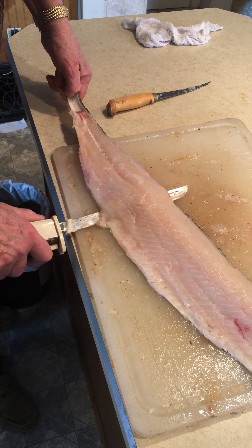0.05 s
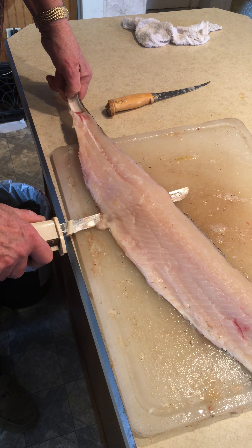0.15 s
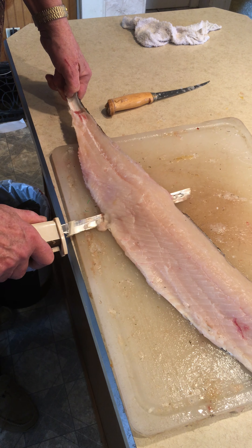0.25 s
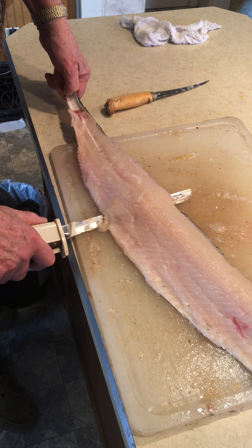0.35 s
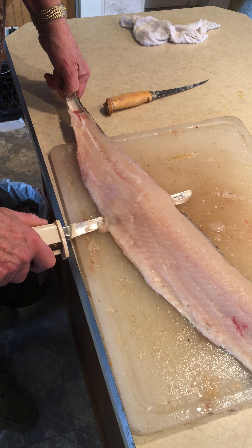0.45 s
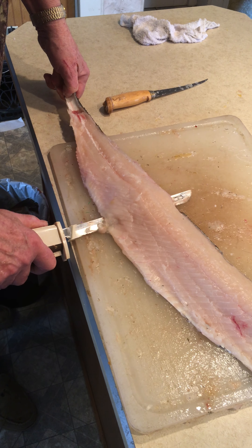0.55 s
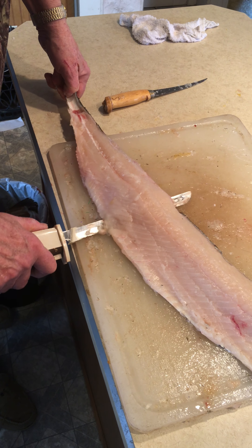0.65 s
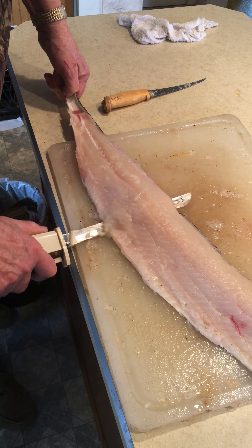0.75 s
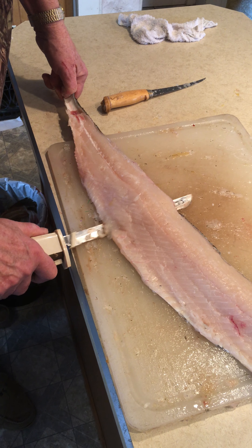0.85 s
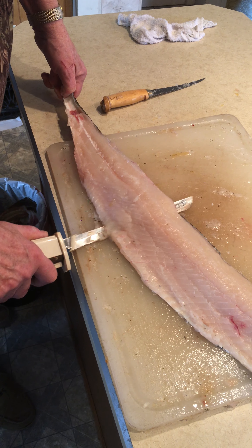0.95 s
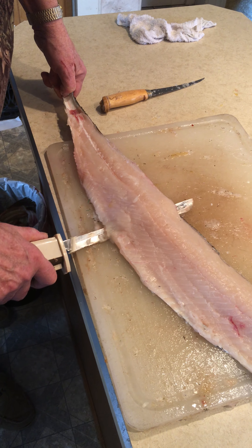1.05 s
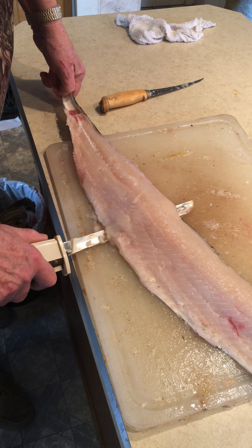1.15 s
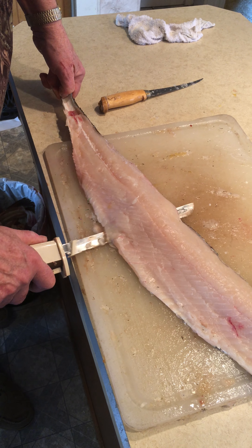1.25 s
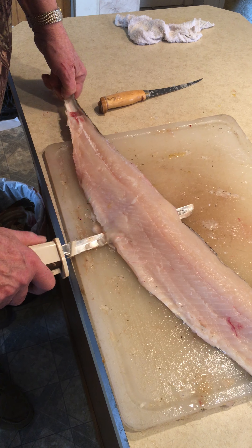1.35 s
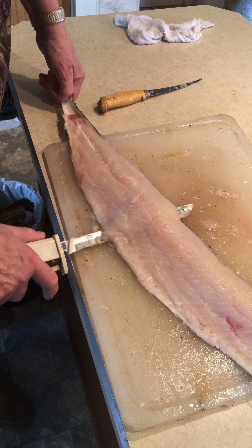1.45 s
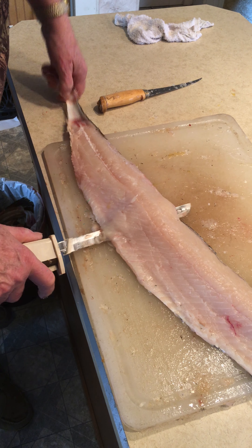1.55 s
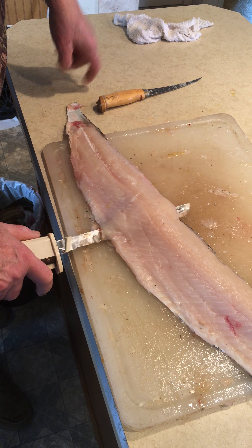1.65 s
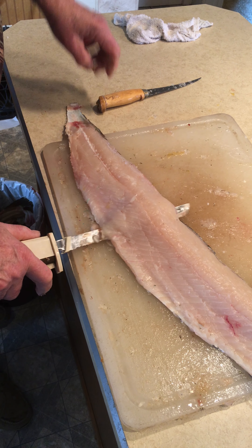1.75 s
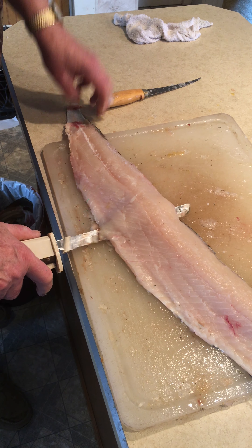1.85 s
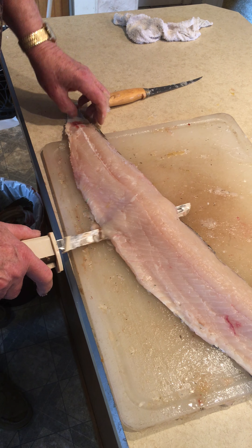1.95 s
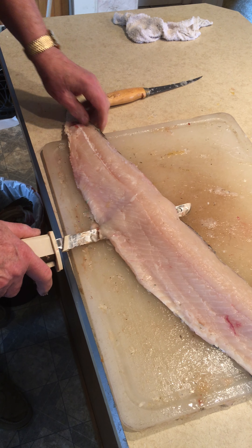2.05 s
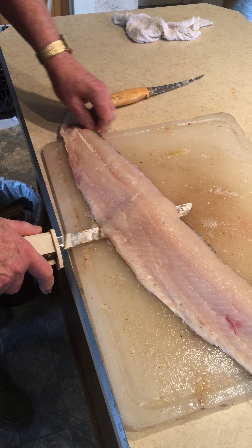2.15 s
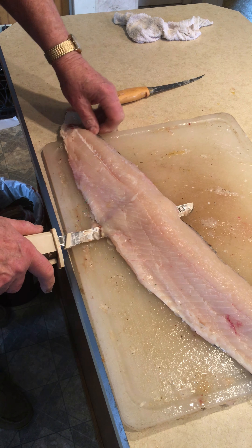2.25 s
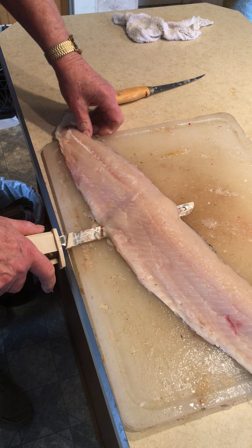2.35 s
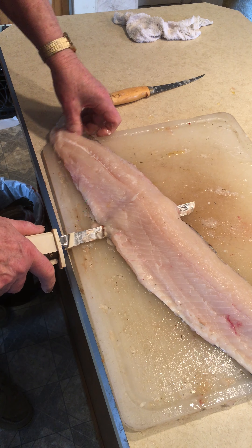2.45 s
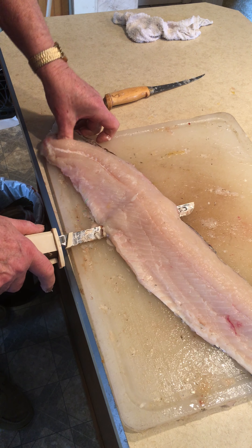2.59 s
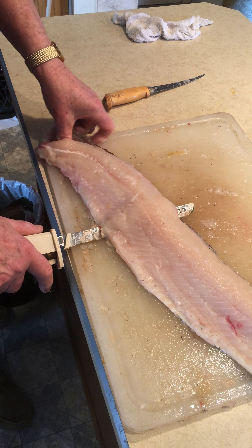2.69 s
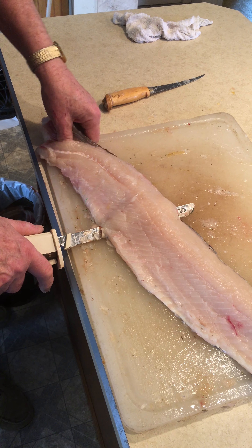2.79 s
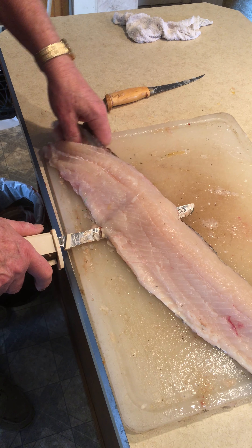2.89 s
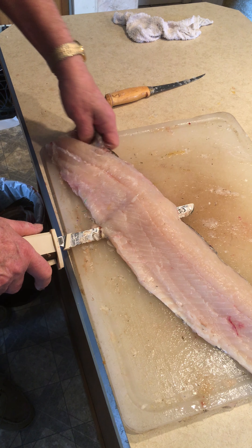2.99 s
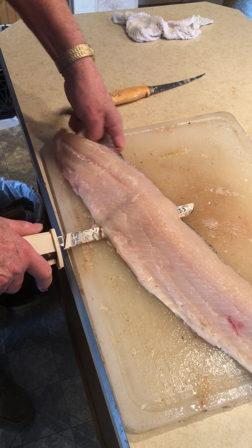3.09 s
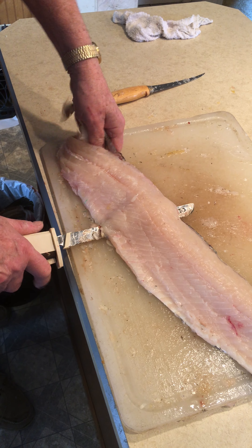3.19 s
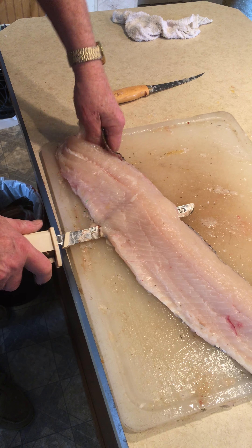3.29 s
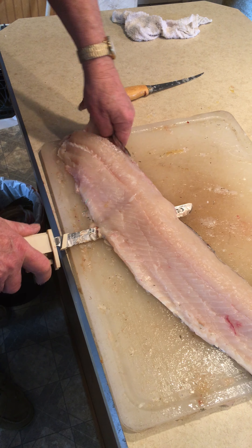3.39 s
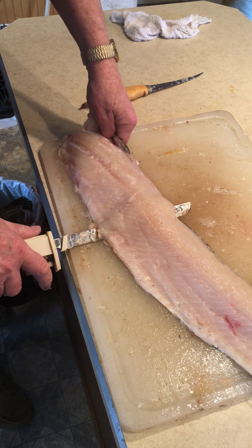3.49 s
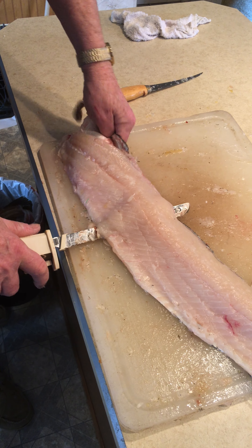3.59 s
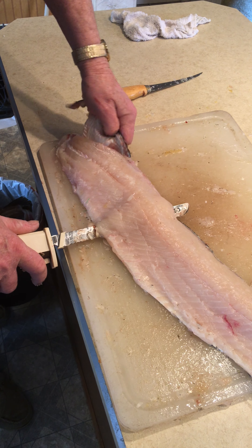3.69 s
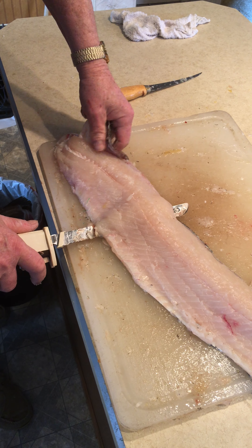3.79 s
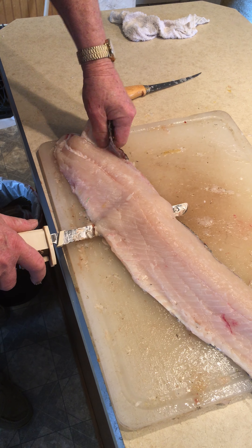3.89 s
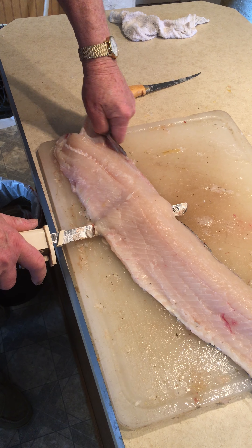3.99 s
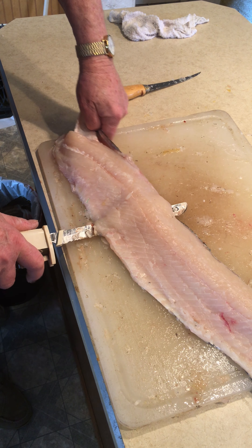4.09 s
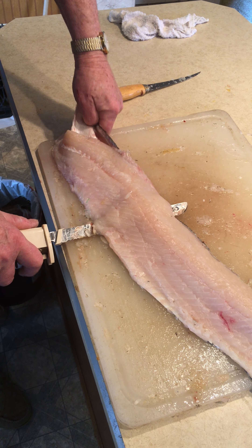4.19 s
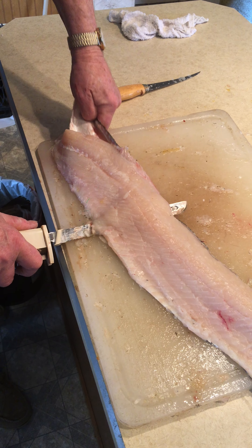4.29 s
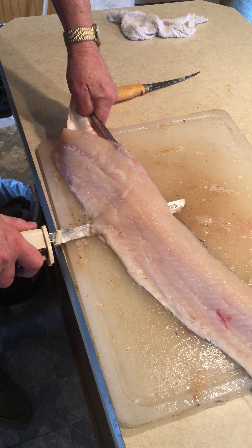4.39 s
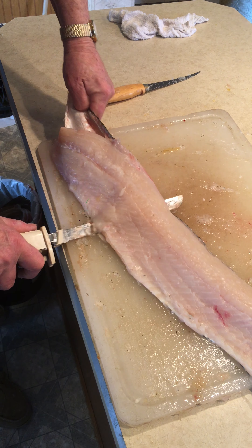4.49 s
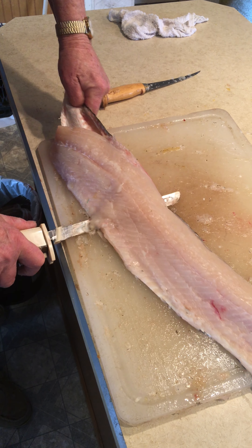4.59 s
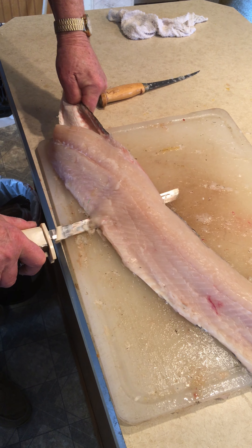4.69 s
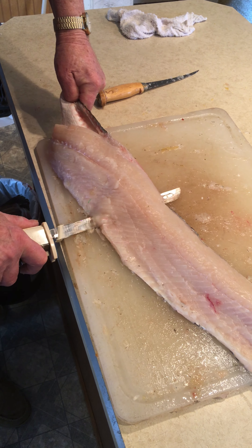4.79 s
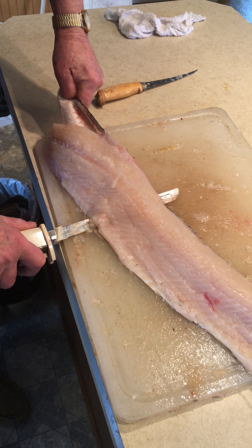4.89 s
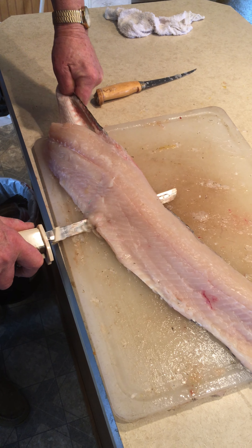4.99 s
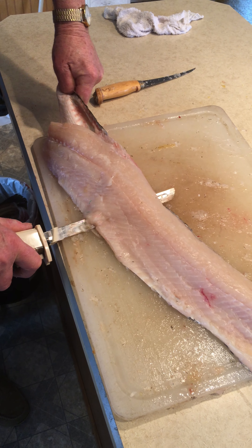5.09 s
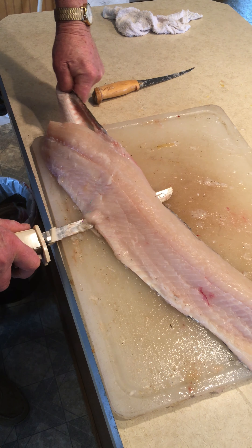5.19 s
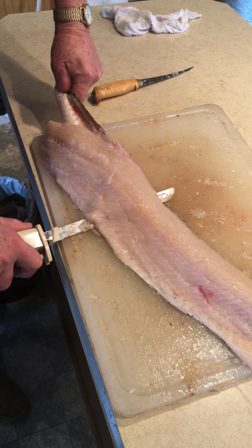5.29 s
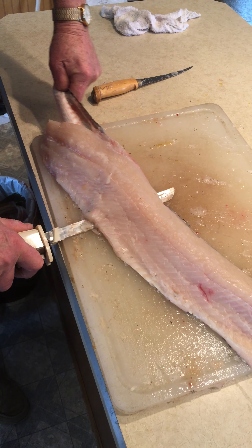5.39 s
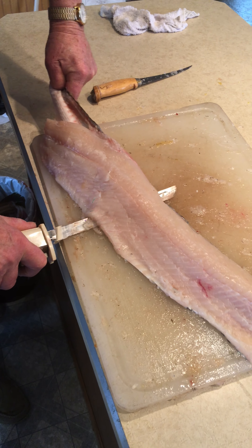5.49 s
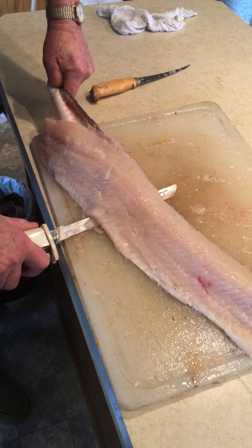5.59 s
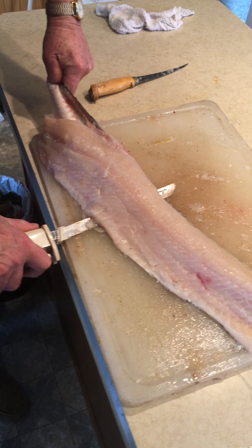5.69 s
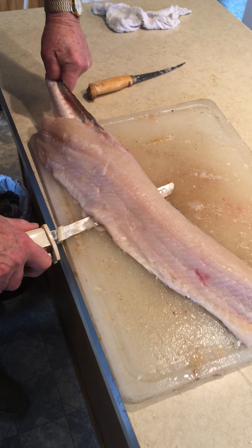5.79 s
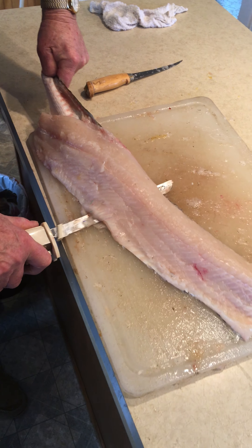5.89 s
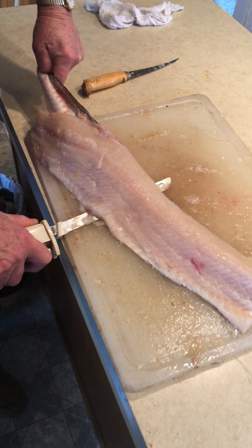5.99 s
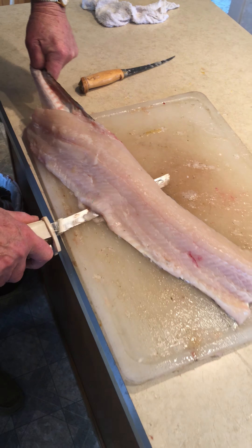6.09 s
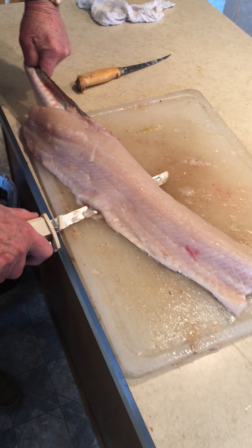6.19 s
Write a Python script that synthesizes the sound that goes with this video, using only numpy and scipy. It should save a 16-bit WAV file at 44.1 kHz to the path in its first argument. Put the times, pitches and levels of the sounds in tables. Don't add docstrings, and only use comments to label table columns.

```python
import sys
import numpy as np
from scipy import signal
from scipy.fft import rfft, irfft, next_fast_len
from scipy.io import wavfile
from scipy.ndimage import uniform_filter1d, map_coordinates

SR = 44100
rng = np.random.default_rng(int(sys.argv[2]) if len(sys.argv) > 2 else 0)


def file_out(sig):
    cols = np.atleast_2d(sig).T
    lim = np.clip(cols, -1, 1)
    pcm = np.round(lim * 32767).astype(np.int16)
    wavfile.write(sys.argv[1], SR, pcm)


def attenuation_scalar(level_db):
    decades = np.asarray(level_db, float) / 20
    return 10 ** decades


N = 275625
T = np.arange(N) / SR

# time_s, turns_per_second_hz
SETTLED_SPEED = [(0, 287), (.4, 286.8), (.72, 290.3), (1.2, 285.9), (1.43, 291.9), (4.29, 325.1),
                 (5.1, 299), (5.3, 302.7), (5.52, 300.8), (5.72, 293.05), (6.25, 281.45)]
# time_s, level_db
FIELD_PULL = [(0, 1.5), (.3, 2.5), (.8, 0), (1, 5.5), (1.43, 2.5), (4.3, -9.5), (4.7, 1), (5.05, 1),
              (5.3, 1.5), (5.7, 1.5), (6, 3), (6.25, 1.5)]
# pitch_hz, level_db
CASING = [(1500, -79), (1850, -50), (2000, -51), (2150, -45.5), (2195, -42), (2270, -40), (2390, -29),
          (2437, -44.5), (2510, -37)]
# pitch_hz, level_db
START_TONES = [(2000, -80), (2300, -39), (3150, -33), (3700, -36.5), (4200, -40.5), (6000, -39),
               (6800, -75)]
# shaft_multiple, level_db (against the knock)
SHAFT_HUM = [(1, -12.5), (2, -30), (24, -22), (32, -24), (40, -20), (48, -20), (4, -26.5), (5, -14.5),
             (6, -18.5), (7, -9), (9, -6), (12, -24), (13, -17.5), (14, -13.5), (15, -14.5)]
# stroke_multiple, level_db
BOARD_SHAKE = [(2, -11), (3, -5), (4, -4), (5, 0), (6, 3), (7, -4), (8, -8), (9, -12)]
# stroke_angle_turns, level_db
CAM_BLOWS = [(0.329, 3.5), (0.391, -30), (0.55, -7), (0.829, -0.5), (0.151, -3.5), (0.675, -5)]
# stroke_angle_turns, level_db
HANDLE_THUMPS = [(.355, 0), (.872, -11), (.115, -14), (.565, -10)]
# time_s, thump_db, knock_db, grip_0_to_1
HAND = [(0, -0.5, -1.5, 0.1), (.3, -1.5, -1, 0.1), (.55, -0.5, -2, 0), (.85, 0, -2.5, 0.2),
        (1.15, -3, -2.5, 0.5), (1.35, -0.5, -0.5, 0.04), (1.5, 2, -4, 0), (4.3, -6.5, -5.5, 0.5),
        (4.7, -4, -1.5, 0.23), (5.2, -4, -5, .6), (5.5, -1, -3, 0.83), (5.85, -1, -3.5, .9),
        (6.25, -0.5, -1, 0.76)]
# time_s, lag_turns
TICK_LAG = [(0, .025), (1.1, .027), (1.43, .062), (1.52, .045), (1.62, 0), (4.2, 0), (4.3, .065),
            (4.75, .04), (6.25, .025)]
# pitch_hz, width_hz, level_db
HOUSING = [(447, 146, -6.5), (1220, 340, -2), (1915, 69, -2), (4054, 500, -5)]
# pitch_hz, width_hz, level_db
LOOSE_SHELL = [(847, 70, 0.5), (936, 60, -2.5), (1025, 26, -6)]
# pitch_hz, width_hz, level_db
GRIPPED_SHELL = [(778, 70, 0), (908, 56, -8), (980, 67, 0.5)]
# pitch_hz, width_hz, level_db
BLADE = [(6260, 1400, -15), (9300, 490, 3.5), (11100, 350, -3.5), (13000, 380, -6), (15600, 430, -24)]
# time_s, pitch_hz
BLADE_BEND = [(0, 9200), (4.3, 9200), (4.5, 8600), (5.45, 8500), (5.8, 9300), (6.25, 10000)]
# pitch_hz, level_db (per Hz)
RATTLE_COLOUR = [(150, -68), (250, -20.5), (294, -2), (345, -2), (648, -10), (748, -4), (944, -8),
                 (1650, -5.5), (2360, -4.5), (2980, -9), (4420, -8), (5010, -13.5), (16400, -25),
                 (17200, -28), (18300, -40)]
# centre_s, half_width_s, level_db
BOARD_PRESSES = [
    (1.0, 0.12, 24),
    (4.93, 0.032, -17),
]
# pitch_hz, level_db (per Hz)
AIR_COLOUR = [(15, -29), (25, 29), (64, 10.5), (550, -9.5), (1100, -5.5), (3900, -18), (5000, -43.5),
              (6580, -37), (14700, -45), (16800, -90), (18300, -51)]
# centre_s, half_width_s, level_db
AIR_SWELLS = [
    (4.07, 0.18, -8),
    (2.74, 0.17, 5),
    (3.6, 0.067, 4),
]
# pitch_hz, time_to_fall_60_db_s
ECHO = [(150, 0.52), (1000, 1), (4000, 0.065), (12000, 0.025)]
# start_s, peak_db, pitch_hz, knock_db
THUDS = [(0.918, -23.5, 151, 11.5), (0.959, -24.5, 99, 11), (0.999, -20, 102.8, 8), (1.052, -27, 145, 8),
         (1.973, -31.5, 99, -11), (2.167, -40, 78, 10), (2.483, -32, 109.5, 7), (2.97, -33.5, 119.5, -4.5),
         (3.129, -28, 124.3, -11), (3.165, -30, 91, -22), (3.2, -41, 84.4, -22), (4.12, -44.5, 69, -24),
         (5.07, -34, 79.6, -20), (1.701, -41, 80, -20), (3.265, -36, 56, -12), (3.399, -35, 62, -10),
         (3.518, -41, 120, -16), (3.877, -48, 80.5, 17.5), (4.907, -28, 141, 19.5), (4.939, -20.5, 154, 12)]
# start_s, peak_db, ring_hz, crack_db
SLAP = [
    (1.927, -19.5, 970, -21),
    (1.926, -17.5, 1520, -21),
]
# start_s, peak_db, ring_hz, crack_db
SKIN_SNAPS = [(2.713, -33.5, 2750, -4), (3.9015, -39, 7050, -7), (2.9874, -41, 1820, -11),
              (3.035, -43, 1700, -21), (3.138, -31, 2300, 1), (3.157, -35.5, 2420, 7),
              (3.241, -35, 2150, -1), (3.2672, -22.5, 2030, -19), (3.304, -19, 8000, -19),
              (3.399, -22, 3340, -6), (3.4445, -28.5, 2500, 3), (3.4714, -14.5, 2290, -31),
              (3.6583, -23, 3900, -26), (3.6625, -27.5, 2280, -21), (3.693, -14, 6060, -32),
              (3.713, -20, 6490, -15), (3.7326, -27, 2050, 4), (3.763, -22, 3120, -18),
              (3.822, -29, 4030, -19), (3.847, -29, 5900, -4), (3.865, -25, 7060, -9),
              (3.883, -15.5, 7050, -3), (3.883, -28, 3040, -20), (3.881, -34.5, 820, -25),
              (3.918, -34, 3320, -9), (4.004, -38.5, 3840, 4), (4.039, -35, 6490, -5),
              (4.1, -26.5, 7900, -3), (4.215, -38.5, 1600, 10), (4.291, -22.5, 3370, -2)]
# start_s, peak_db, ring_hz, crack_db
SMALL_SNAPS = [(3.1208, -47, 12000, -10), (3.141, -38, 2400, -4), (3.198, -40, 9100, 3),
               (3.2953, -33, 2050, -15), (3.283, -38, 4000, -5), (3.288, -36, 10500, -5),
               (3.347, -41, 9000, 2), (3.3817, -44, 2680, -5.5), (3.402, -32, 12100, 4),
               (3.407, -36, 13500, -4), (3.42, -39, 8000, -5), (3.426, -40, 3100, -15),
               (3.456, -40, 13000, -5), (3.463, -35, 11500, -5), (3.467, -32, 8200, -3),
               (3.48, -30, 2300, -15), (3.491, -38, 2300, -15), (3.51, -43, 12000, -3),
               (3.517, -45, 12000, -3), (3.667, -25, 3950, -16), (3.678, -47, 7000, -3),
               (3.716, -24, 6300, -3), (3.719, -26, 9000, -7), (3.7304, -19, 6800, -10),
               (3.735, -28, 2600, -10), (3.7383, -26, 2700, -12), (3.742, -26, 2820, -13),
               (3.777, -39, 9500, -5), (3.952, -38, 6000, 3), (4.021, -46, 11000, -9),
               (4.0747, -42, 2420, 6), (4.084, -46, 9000, 0), (4.155, -40, 4000, -10),
               (4.174, -34, 8200, -6), (4.219, -36, 2110, 4), (4.2722, -39, 4070, 2),
               (4.281, -43, 8000, -3), (4.296, -27, 1060, -20)]
# start_s, peak_db
DRY_TICKS = [(2.6283, -45.5), (2.6462, -41), (2.9275, -46), (3.155, -42), (3.227, -36), (3.2662, -32.5),
             (3.286, -42), (3.338, -37), (3.396, -55), (3.4383, -36), (3.4614, -46), (3.5693, -40),
             (3.6769, -53), (3.735, -36), (3.7635, -21.5), (3.8066, -36), (3.8235, -40), (3.8475, -44),
             (3.8699, -35), (3.882, -21), (3.9014, -28), (3.9178, -31), (4.0586, -34), (4.1184, -56),
             (4.137, -34), (4.161, -36), (4.213, -36), (4.2351, -41), (4.2523, -38), (4.2887, -34)]
# centre_s, half_width_s, level_db
GRIPS = [
    (3.29, 0.04, 10),
    (3.44, 0.057, 8),
    (3.72, 0.081, 15.5),
    (3.86, 0.063, 9.5),
    (4.22, 0.097, 5.5),
    (2.83, 0.025, 6.5),
    (3.15, 0.02, 5),
]
# pitch_hz, width_hz, level_db
COUNTER = [(317, 81, -6), (1183, 120, -5)]
# centre_s, half_width_s, level_db
SLIDES = [
    (3.45, 0.067, 3.7),
    (3.65, 0.21, 11.6),
]

OFF_S, ON_S, FADE_S, FULL_HZ = 1.43, 4.29, .04, 290
BRAKE_HZ, SAG_HZ_PER_S, CREEP_HZ_PER_S, REST_S = 18.75, 204.6, 150.7, 2.9
SLOW_SHARE, SLOW_S, QUICK_S = .635, .266, .042
UPPER_DB, LOWER_DB, OCTAVE_DB, OCTAVE_GROWS = -2.5, -2.5, -52, 1.1
KNOCK_DB, KNOCK_GROWS, FREE_DB, FREE_GROWS = -38.5, .43, -20, 5.2
RATTLE_DB, RATTLE_GROWS, IDLE_DB = -33.5, 1.09, -.77
BOARD_DB, BOARD_GROWS = -51, 2
TICK_DB, TICK_GROWS, RESEATED_DB = -28.5, 1, -4
SLACK_DB, STALL_HZ = -33, 58
DULL_HZ, DULL_SHARE = 9000, .45
HUM, FREE_HUM = .25, .8
AIR_DB, DAMP_DB, SCRAPE_DB = -50, -64, -72
INRUSH_DB, INRUSH_S = 2, .07


def unit(x):
    return x / np.sqrt(np.mean(x ** 2) + 1e-20)


def along(points, hz):
    f, v = np.transpose(points)
    return np.interp(np.log(hz + 1), np.log(f + 1), v)


def curves(rows, outside=-120):
    s, *cols = np.transpose(rows)
    return np.array([np.interp(T, s, c, outside, outside) for c in cols])


def swells(rows):
    return sum(db * np.exp(-((T - s) / width) ** 2) for s, width, db in rows)


def wobble(rate):
    coarse = np.arange(0, N + 8, 8)
    knots = rng.standard_normal(int(N * rate / SR) + 4)
    return np.interp(np.arange(N), coarse, map_coordinates(knots, [coarse * rate / SR]))


def filtered(x, response):
    m = next_fast_len(N + SR // 2)
    return irfft(rfft(x, m) * response(np.fft.rfftfreq(m, 1 / SR)), m)[:N]


def body(modes):
    def response(f):
        return sum((-1) ** k * attenuation_scalar(db) * 1j * f * w / (c * c - f * f + 1j * f * w)
                   for k, (c, w, db) in enumerate(modes))
    return response


def steep(modes):
    return lambda f: sum(attenuation_scalar(db) * body([(c, w, 0)])(f) ** 2 for c, w, db in modes)


def thin_bass(corner_hz):
    return lambda hz: 1 - .7 / (1 + (hz / corner_hz) ** 4)


def hiss(spectrum):
    return unit(filtered(rng.standard_normal(N), lambda hz: attenuation_scalar(along(spectrum, hz))))


def turns():
    settle = curves(SETTLED_SPEED, None)[0]
    off, on = T - OFF_S, np.maximum(T - ON_S, 0)
    released_hz = np.interp(OFF_S, *np.transpose(SETTLED_SPEED))
    sag = released_hz - BRAKE_HZ * np.clip(off / FADE_S, 0, 1) - SAG_HZ_PER_S * off
    coast = np.maximum(np.maximum(sag, CREEP_HZ_PER_S * (REST_S - T)), 0)
    missing = SLOW_SHARE * np.exp(-on / SLOW_S) + (1 - SLOW_SHARE) * np.exp(-on / QUICK_S)
    start = settle * (1 - missing)
    shaft = np.cumsum(np.where(off < 0, settle, coast + start)) / SR
    return shaft, shaft / 10 + .62 * (T > 3.5)


def switch():
    return np.clip(1 - (T - OFF_S) / FADE_S, 0, 1) + np.clip(100 * (T - ON_S), 0, 1)


def singing(speed, power):
    pull_db = curves(FIELD_PULL, None)[0]
    off_db = 60 * (power - 1)
    slot, upper, lower = (along(CASING, np.abs(8 * speed + side)) + pull_db + off_db
                          for side in (0, 120, -120))
    return slot, upper + UPPER_DB, lower + LOWER_DB, OCTAVE_DB + OCTAVE_GROWS * pull_db + off_db


def brushes(spin, speed, stroke, power):
    def skip(k):
        return wobble(550) * attenuation_scalar(2 * wobble(60)) * np.sin(k * spin)

    drag = np.abs(np.sin(np.pi * (stroke - .97)))
    free = attenuation_scalar(np.clip(16 - speed / 12, 2, 10.5)) * (speed > STALL_HZ) * (1 - power)
    free = free * .8 * drag ** .9 * attenuation_scalar(1.6 * wobble(60)) * skip(34)
    return free + attenuation_scalar(-1) * power * skip(24)


def motor(shaft, stroke, knock_db, rattle_db, power):
    speed = np.gradient(shaft) * SR
    slot_db, upper_db, lower_db, octave_db = singing(speed, power)
    surge = power * np.clip((282 - speed) / 25, 0, 1) * np.clip((speed - 70) / 30, 0, 1)
    surge_db = 30 * (surge - 1)
    octave_db = np.maximum(octave_db, surge_db + along(START_TONES, 16 * speed))
    octave_db = octave_db + 2 - 2 * surge + 3 * wobble(150) + 2 * surge * np.sin(4 * np.pi * stroke)
    third_db = surge_db + along(START_TONES, 24 * speed) - np.clip(speed / 5 - 25, 6, 16) + 3 * wobble(90)
    fourth_db = surge_db + along(START_TONES, 32 * speed) - 14
    seventh_db = 30 * surge * np.clip((speed - 235) / 20, 0, 1) - 69
    linger = np.roll(uniform_filter1d(power, size=5000), 4500)
    spin, mains = 2 * np.pi * shaft, 2 * np.pi * 120 * T

    def tone(phase, db):
        unsteady = 2 * np.pi * rng.random() + .12 * wobble(70)
        return np.sqrt(2) * attenuation_scalar(db + wobble(30)) * np.sin(phase + unsteady)

    whine = tone(8 * spin, slot_db + 7 * surge)
    whine += tone(8 * spin + mains, upper_db + 9 * surge)
    whine += tone(8 * spin - mains, lower_db)
    whine += tone(8 * spin + 2 * mains, lower_db - 6)
    whine += tone(16 * spin + .85 * wobble(400), octave_db)
    whine += tone(24 * spin + .8 * wobble(250), third_db)
    whine += tone(32 * spin + wobble(250), fourth_db)
    whine += tone(7 * spin, seventh_db)
    whine += tone(mains, 30 * surge - 83)
    for k, db in SHAFT_HUM:
        loss_db = (14 + 12 / k * (1 - linger)) * (1 - power) + 10 * surge / k
        whine += tone(k * spin, knock_db + db - loss_db + .5 * wobble(3.1))

    def window(hz):
        return body([(3200, 3600, 0)])(hz) ** 2 / (1 + (hz / 4600) ** 12) / (1 + (2000 / (hz + 1)) ** 8)

    return whine + filtered(attenuation_scalar(rattle_db) * brushes(spin, speed, stroke, power), window)


def contacts(stroke, blows, scatter_db, slack):
    angle, db = np.transpose(blows)
    whole = np.arange(int(stroke[-1]) + 1)[:, None]
    uneven = slack * rng.standard_normal((len(whole), len(angle)))
    at = np.interp(whole + angle + uneven, stroke, np.arange(N))
    size = attenuation_scalar(db + scatter_db * rng.standard_normal(at.shape)) * (at < N - 1)
    return np.bincount(at.astype(int).ravel(), size.ravel(), N)


def knocks(stroke, power, middle, knock_db, tick_db):
    teeth = [(k / 10 + .02, db) for k, db in enumerate(rng.normal(-27, 4, 10))]
    loaded = contacts(stroke, CAM_BLOWS + teeth, scatter_db=1, slack=.0008)
    thump_db, cam_db, grip = curves(HAND, None)
    thump = attenuation_scalar(KNOCK_DB + 54.5 + thump_db) * np.roll(power, 1500)
    thump = thump * contacts(stroke, HANDLE_THUMPS, scatter_db=1.1, slack=.0008)
    knock = filtered(attenuation_scalar(knock_db + 47 + cam_db) * power * loaded, steep(HOUSING))
    for share, shell in ((1 - grip, LOOSE_SHELL), (grip, GRIPPED_SHELL)):
        knock += filtered(share * thump, lambda hz: sum(body([half])(hz) for half in shell)
                          * body([(880, 520, 0)])(hz))
    handle = body([(340, 240, 5), (820, 200, 2), (1250, 440, 0), (1900, 300, -1)])
    return knock + filtered(attenuation_scalar(tick_db + 29) * (1 - power) * np.roll(middle, 70), handle)


def ticks(stroke, power, middle, ends, rattle_db, tick_db):
    free = 1 - power
    tick = filtered(attenuation_scalar(tick_db + 30.5) * np.roll(power, 2500) * middle, body(BLADE[2:4]))
    tick += filtered(attenuation_scalar(tick_db + 26) * free * middle + attenuation_scalar(rattle_db + 21) * ends, body(BLADE))
    tick += filtered(attenuation_scalar(rattle_db + 19) * free * ends, steep([(10500, 9000, 0)]))
    tick += filtered(attenuation_scalar(rattle_db + 27) * power * ends, body([(4440, 650, 0)]))
    moving = np.gradient(stroke) * SR > STALL_HZ / 10
    closing = attenuation_scalar(SLACK_DB + 23) * moving * free * (middle + .5 * ends)
    return tick + filtered(closing, steep([(7200, 1800, 0)]))


def blade_rattle(power, middle, ends, rattle_db):
    free = 1 - power
    burst = signal.lfilter([1], [1, -np.exp(-1 / (.0013 * SR))], ends + .4 * middle)
    level = attenuation_scalar(rattle_db + 1 + 1.2 * wobble(120) + free * wobble(70))
    rattle = level * (1 + 1.1 * burst) * hiss(RATTLE_COLOUR)
    steel = body(BLADE[:1] + BLADE[2:])
    loose = filtered(rattle, lambda hz: thin_bass(1500)(hz) * (1 + .5 * np.abs(steel(hz))))
    loose += filtered((HUM * power + FREE_HUM * free) * rattle, body([(820, 360, 0)]))
    bend_hz = curves(BLADE_BEND, None)[0]
    for ring_hz in (8600, 9250, 9900):
        near = np.clip(1 - np.abs(bend_hz - ring_hz) / 650, 0, 1)
        loose += filtered(near * rattle, lambda hz: .8 * np.abs(body([(ring_hz, 500, 0)])(hz)) ** 2)
    treble = filtered(loose, lambda hz: 1 / (1 + (DULL_HZ / (hz + 1)) ** 4))
    return loose - DULL_SHARE * free * treble


def board(stroke, power, board_db):
    shake = sum(attenuation_scalar(db + wobble(17)) * np.sin(2 * np.pi * (k * stroke + rng.random()))
                for k, db in BOARD_SHAKE)
    rumble = (.9 + 3.3 * (1 - power)) * hiss([(40, -32), (70, -19), (200, -3), (400, -14)])
    return attenuation_scalar(board_db) * (power * shake + rumble)


def gears(stroke, power, knock_db, rattle_db, tick_db, board_db):
    lag = curves(TICK_LAG, None)[0]
    middle = contacts(stroke - lag, [(.535, 0)], scatter_db=1.5, slack=.002)
    ends = contacts(stroke - lag / 2, [(.29, -2), (.795, 1)], scatter_db=2, slack=.003)
    clatter = knocks(stroke, power, middle, knock_db, tick_db)
    clatter += ticks(stroke, power, middle, ends, rattle_db, tick_db)
    clatter += blade_rattle(power, middle, ends, rattle_db)
    return clatter + board(stroke, power, board_db)


def knife():
    shaft, stroke = turns()
    power, speed = switch(), np.gradient(shaft) * SR
    free = 1 - power
    speed_db = 20 * np.log10(np.abs(speed) / FULL_HZ + 1e-3)
    press_db = swells(BOARD_PRESSES)
    knock_db = power * (KNOCK_DB + KNOCK_GROWS * speed_db + .08 * press_db)
    knock_db += free * (FREE_DB + FREE_GROWS * speed_db)
    rattle_db = RATTLE_DB + RATTLE_GROWS * speed_db
    rattle_db += free * (IDLE_DB - .033 * np.clip(75 - speed, 0, 40))
    slack_db = SLACK_DB - np.clip((85 - speed) / 4, 0, 5) - np.clip((speed - 120) / 20, 1, 3)
    slack_db -= 30 * (speed < STALL_HZ)
    tick_db = power * (TICK_DB + TICK_GROWS * speed_db + RESEATED_DB * (T > ON_S)) + free * slack_db
    board_db = BOARD_DB + BOARD_GROWS * speed_db + .23 * press_db
    whine = motor(shaft, stroke, knock_db, rattle_db, power)
    return whine, gears(stroke, power, knock_db, rattle_db, tick_db, board_db)


def room_air():
    return attenuation_scalar(AIR_DB) * attenuation_scalar(1.5 * wobble(4) + swells(AIR_SWELLS)) * hiss(AIR_COLOUR)


def kitchen(x):
    hz, t, z = signal.stft(rng.standard_normal(SR // 2), SR, nperseg=256)
    fading = z * attenuation_scalar(-60 * t / along(ECHO, hz)[:, None])
    tail = signal.istft(fading, SR, nperseg=256)[1]
    return signal.fftconvolve(np.pad(x, (200, 0)), tail / np.linalg.norm(tail))[:N]


def thuds():
    out, t = np.zeros(N + SR), np.arange(SR // 3) / SR
    for s, db, hz, knock_db in THUDS:
        boom = sum(attenuation_scalar(g - 60 * t / .18) * np.sin(2 * np.pi * hz * r * t)
                   for r, g in [(.52, -4.5), (1, -3), (1.55, -8.5), (2.6, -17)])
        rough = 4 * rng.standard_normal(len(t)).cumsum() / 20
        knock = attenuation_scalar(knock_db - 60 * t / .04) * np.sin(2 * np.pi * 960 * t + rough)
        out[round(s * SR):][:len(t)] += attenuation_scalar(db) * (1 - np.exp(-t / .008)) * (boom + knock)
    return out[:N]


def crackle():
    grains = (rng.random(N) < 4000 / SR) * rng.standard_normal(N)
    grains = grains * attenuation_scalar(3.5 * np.minimum(rng.exponential(size=N), 3))
    wet = unit(filtered(grains, body([(2900, 2600, 8.1), (9900, 6800, 4)])))
    wet += .24 * hiss([(250, -16), (500, -20), (1150, 13), (3000, 1), (6000, -6), (14000, -11)])
    present_db = curves([(2.5, -13), (2.9, -1), (4.4, 2)])[0]
    return attenuation_scalar(DAMP_DB + swells(GRIPS) + present_db) * wet


def skin():
    out, bright, t = np.zeros(N + SR), np.zeros(N + SR), np.arange(SR // 40) / SR
    for s, db, hz, crack_db in SKIN_SNAPS + SLAP + SMALL_SNAPS:
        here = slice(round(s * SR), round(s * SR) + len(t))
        drift = .09 * rng.standard_normal(len(t)).cumsum()
        ring = (1 - np.exp(-t * hz)) * np.sin(2 * np.pi * hz * t + drift)
        out[here] += attenuation_scalar(db - 60 * t * hz / 16) * ring
        bright[here] += attenuation_scalar(db + crack_db - 10 - 60 * t / .011) * rng.standard_normal(len(t))
    for s, db in DRY_TICKS:
        bright[round(s * SR):][:len(t)] += attenuation_scalar(db - 1 - 60 * t / .0055) * rng.standard_normal(len(t))
    return out[:N] + filtered(bright[:N], body([(10500, 15000, 0)])) + crackle()


def scrape():
    rough = unit(filtered(rng.standard_normal(N), lambda hz: body(COUNTER)(hz) ** 2))
    return attenuation_scalar(SCRAPE_DB + swells(SLIDES) + .71 * wobble(40)) * rough


def inrush():
    on = T - ON_S
    pulses = np.diff(np.floor(120 * on), prepend=0) * (on > 0) * attenuation_scalar(2 * wobble(100))
    fade = np.exp(-np.abs(on - .04) / INRUSH_S)
    return filtered(attenuation_scalar(INRUSH_DB) * fade * pulses, body(LOOSE_SHELL[:2]))


def scene():
    whine, clatter = knife()
    near = thuds() + skin() + scrape() + inrush()
    to_room = attenuation_scalar(-16) * near + attenuation_scalar(-10) * filtered(clatter, thin_bass(1600)) + whine / 10
    return (near + whine + clatter + kitchen(to_room) + room_air())[None]


def top_cut(x):
    return signal.sosfilt(signal.butter(12, 17500, fs=SR, output="sos"), x)


def record(dry):
    def microphone(hz):
        return (hz < 17700) * hz ** 6 / (hz ** 6 + 48. ** 6)

    mix = filtered(dry[0], microphone)[None]
    return top_cut(mix)


dry = scene()
out = record(dry)
file_out(out)
```